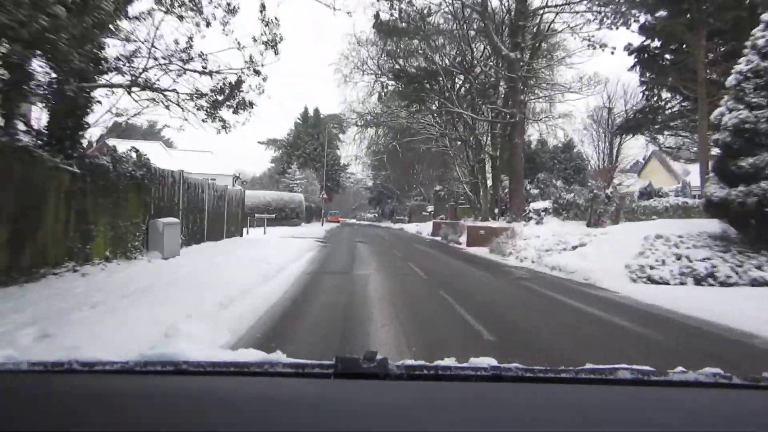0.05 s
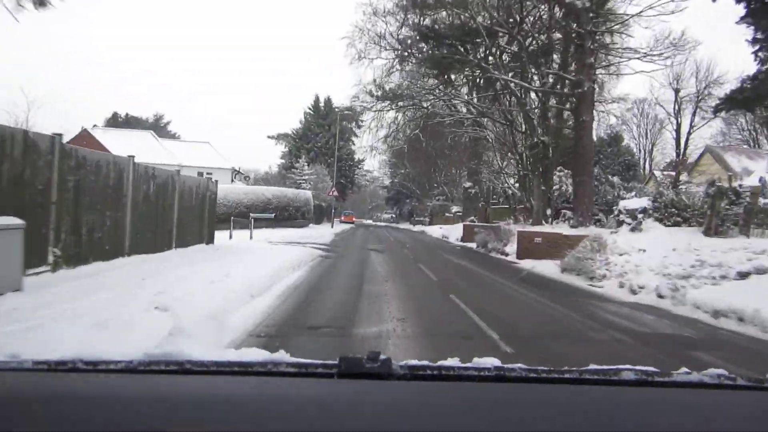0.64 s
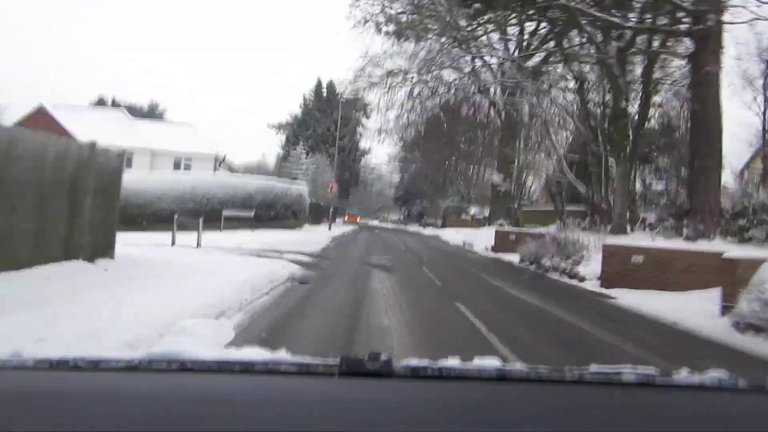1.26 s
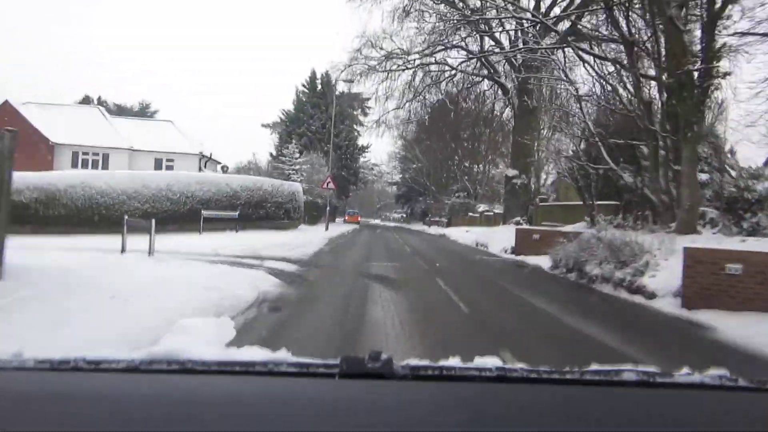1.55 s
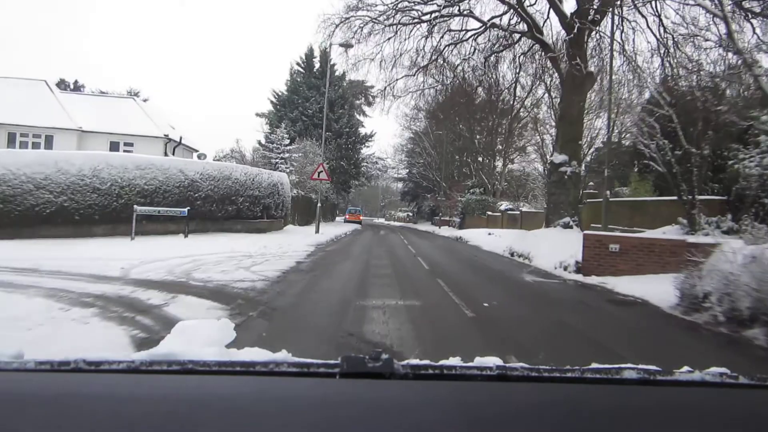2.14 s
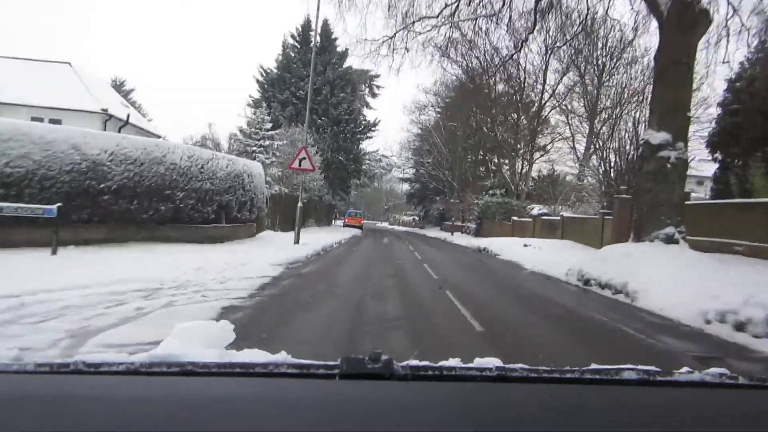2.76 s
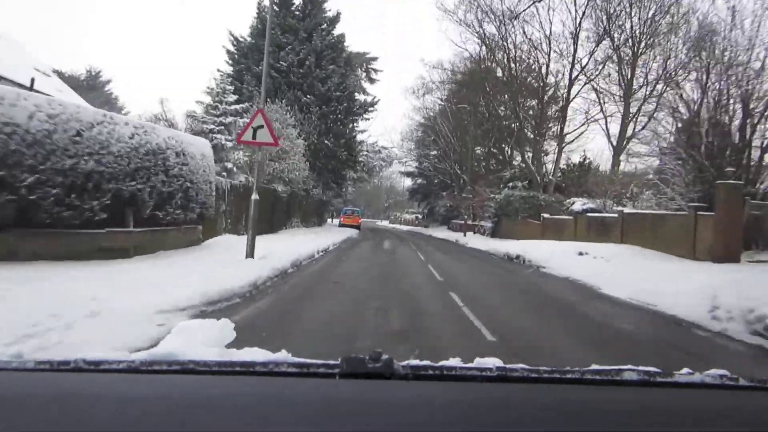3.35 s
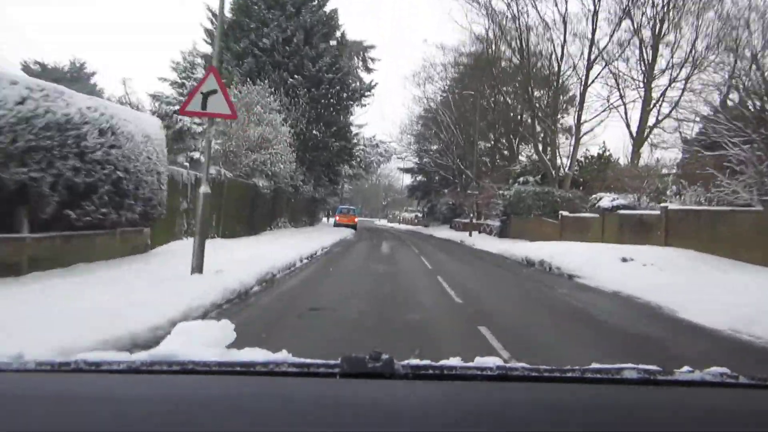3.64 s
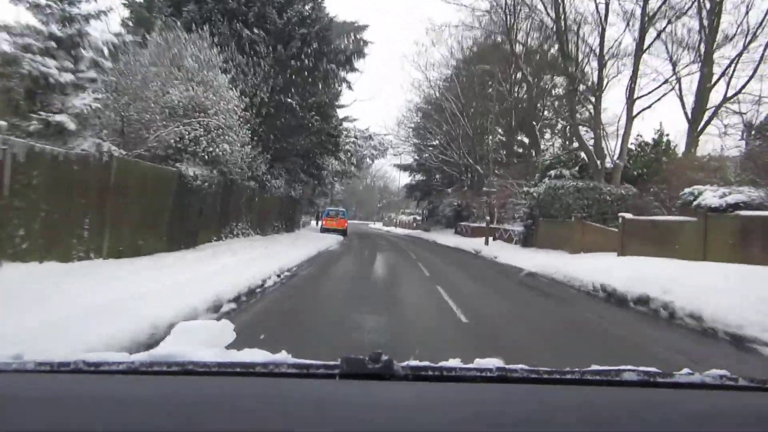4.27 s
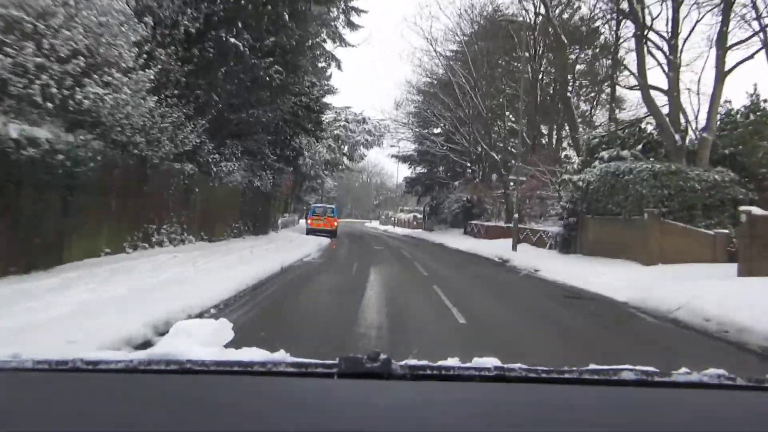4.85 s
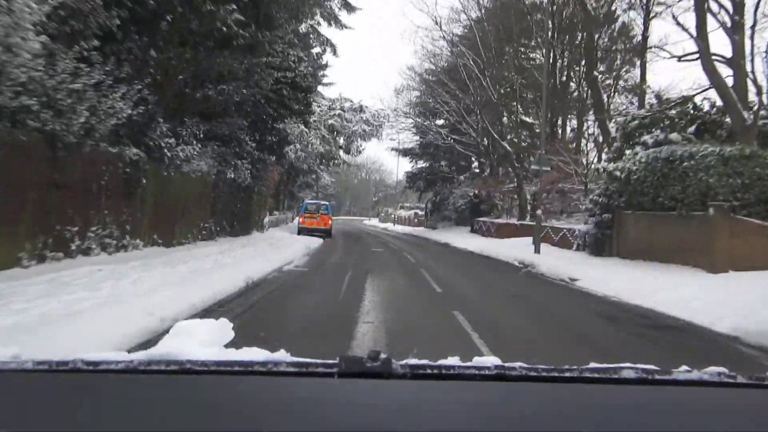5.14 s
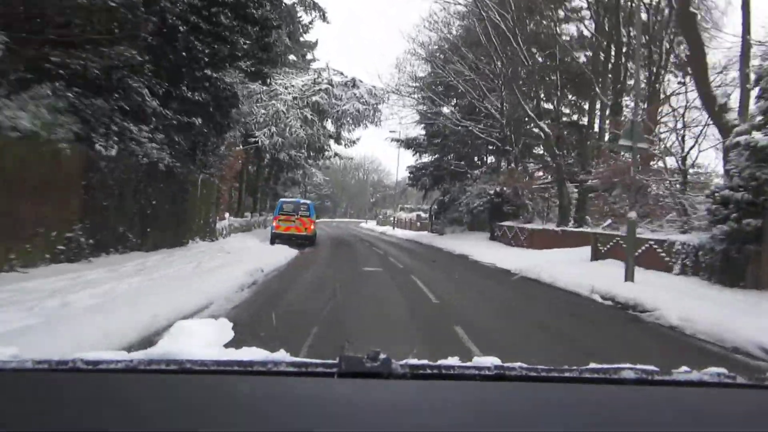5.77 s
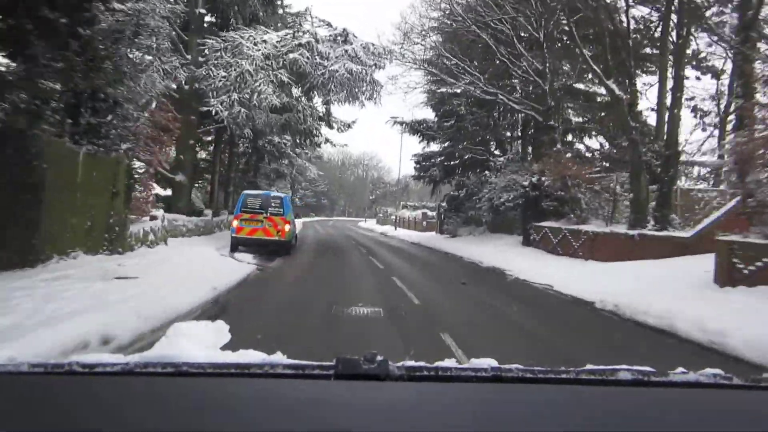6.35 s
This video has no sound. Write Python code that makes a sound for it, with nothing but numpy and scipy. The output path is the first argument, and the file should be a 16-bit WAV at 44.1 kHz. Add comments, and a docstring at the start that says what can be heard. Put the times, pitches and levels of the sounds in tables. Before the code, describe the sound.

Heard from behind the windscreen of a moving car, a low engine drone and tyre rumble run throughout, with a faint hiss of water and slush. A little after one second the wheels knock over a road seam and the plastic trim rattles. More bumps follow at around two seconds and just after four, each with a low shudder. Near the end the wet hiss swells.

```python
"""A low drone and rumble fill a small car on a wet winter road: the engine fires, the tyres excite the cabin.
Water and slush fizz in the wheel arches; the hiss swells on a wetter stretch near the end.
Each road seam strikes the front wheels and, a quarter of a second later, the rear: knocks, a shudder,
clunking joints, rattling trim. A faint whistle comes and goes, and grit pings off the underbody.
The camera's gain control ducks after hard jolts and creeps back."""
import sys
import numpy as np
from scipy import signal
from scipy.fft import rfft, irfft, next_fast_len
from scipy.io import wavfile
from scipy.ndimage import uniform_filter1d, map_coordinates

SR = 44100
rng = np.random.default_rng(int(sys.argv[2]) if len(sys.argv) > 2 else 0)


def master_out(mix):
    """Clip the mix to full scale and print it as 16-bit PCM to the path in sys.argv[1]."""
    frames = np.transpose(np.atleast_2d(mix))
    ceiling = np.clip(frames, -1, 1)
    pcm = np.round(ceiling * 32767).astype(np.int16)
    wavfile.write(sys.argv[1], SR, pcm)


N = 287091


def amp(db):
    """Decibels to amplitude ratio."""
    return 10 ** (np.asarray(db) / 20)

def unit(x):
    """Normalisation to rms 1."""
    return x / np.sqrt(np.mean(x ** 2) + 1e-20)

def clock():
    """The time of every sample."""
    return np.arange(N) / SR

def curves(rows):
    """Linear interpolation of each column after the time, one value per sample."""
    s, *cols = np.transpose(rows)
    return [np.interp(clock(), s, c) for c in cols]

def bursts(rows):
    """A sum of Gaussian envelopes from rows of t/s, level/dB, half length/s."""
    return sum(amp(db) * np.exp(-((clock() - s) / half) ** 2) for s, db, half in rows)

def wobble(rate):
    """Smooth random modulation, rate knots a second."""
    return map_coordinates(rng.standard_normal(int(N * rate / SR) + 4), [clock() * rate])

def noise():
    """White Gaussian noise."""
    return rng.standard_normal(N)

def grains(rate, spread_db):
    """Shot noise: impulses of uneven size, rate a second, at rms 1."""
    impulses = (rng.random(N) < rate / SR) * noise()
    return unit(impulses * amp(spread_db * rng.exponential(size=N).clip(0, 4)))

def filtered(x, response):
    """Linear filtering: the spectrum of x times a frequency response."""
    m = next_fast_len(len(x) + SR // 2)
    return irfft(rfft(x, m) * response(np.fft.rfftfreq(m, 1 / SR)), m)[:len(x)]

def coloured(x, spectrum):
    """Spectral shaping by points of f/Hz, level/dB, at rms 1."""
    hz, db = np.transpose(spectrum)
    return unit(filtered(x, lambda f: amp(np.interp(np.log(f + 1), np.log(hz), db, -120))))

def resonate(x, modes):
    """Forced response of parallel resonators with rows of f/Hz, bandwidth/Hz, gain/dB."""
    return filtered(x, lambda f: sum(amp(db) * 1j * f * width / (hz * hz - f * f + 1j * f * width)
                                     for hz, width, db in modes))

def narrowband(x, hz, width):
    """One resonance applied twice, at rms 1."""
    mode = [(hz, width, 0)]
    return unit(resonate(resonate(x, mode), mode))

def band(x, low_hz, high_hz, order=4):
    """A band-pass with Butterworth slopes."""
    return filtered(x, lambda f: 1 / np.sqrt((1 + (low_hz / (f + 1)) ** (2 * order))
                                             * (1 + (f / high_hz) ** (2 * order))))

def add(track, s, sound):
    """Superpose a sound on the track at time s."""
    part = track[round(s * SR):][:len(sound)]
    part += sound[:len(part)]

def chirps(rows):
    """Narrow-band noise pulses from rows of t/s, level/dB, f/Hz, bandwidth/Hz, half length/s."""
    out, t = np.zeros(N), np.arange(-SR // 20, SR // 20) / SR
    for s, db, hz, width, half in rows:
        ring = narrowband(rng.standard_normal(len(t)), hz, width)
        add(out, s + t[0], amp(db) * np.exp(-(t / half) ** 2) * ring)
    return out

def free_decay(t, hz, db, t60, rise_s):
    """Free vibration: a sum of damped sinusoids with a soft onset."""
    ring = np.sum(amp(db - 60 * t / t60) * np.sin(2 * np.pi * hz * t), axis=0)
    return ring * (1 - np.exp(-t / rise_s))


# engine firing: t/s, f/Hz, fundamental level/dB, second harmonic level/dB
FIRING = [(0, 49.26, -22, -38), (.7, 48.9, -25.5, -35), (3.3, 48.8, -26.5, -38), (4.4, 48.43, -23, -35),
          (5.1, 47, -33.5, -31.5), (5.9, 46.3, -24, -31.5), (6.51, 47, -29, -34)]

def engine():
    """Transmission loss: the bulkhead passes only the firing frequency and its second harmonic."""
    hz, db, harmonic_db = curves(FIRING)
    phase = 2 * np.pi * np.cumsum(hz * (1 + 0.0064 * wobble(4.5))) / SR
    drone = amp(db) * unit(np.sin(phase)) + amp(harmonic_db) * unit(np.sin(2 * phase))
    return amp(1.7 * wobble(12)) * drone


# coarseness of the asphalt: t/s, relative level/dB
COARSENESS = [(0, -1.5), (.4, -1.5), (.8, 1), (1.15, 1.5), (1.7, -1.5), (2.2, 1.5), (2.45, 0.4), (2.8, -2),
              (3.7, 0), (4.9, -1), (6.3, 1)]
# cabin air, panel and tyre cavity resonances: f/Hz, bandwidth/Hz, gain/dB
CABIN_MODES = [(27, 8.1, 6), (47.7, 6.8, -1.5), (62, 26, -5.5), (86, 17, -.8), (103, 15, -4.5),
               (154, 22, -9.5), (206, 8, -12), (221, 9, -6.5), (286, 8, -23), (366.6, 48, -17),
               (405, 32, -27), (468, 114, -17.5)]
# glass and door resonances: f/Hz, bandwidth/Hz, gain/dB
PANEL_MODES = [(840, 27, -5), (995, 40, -3), (1170, 60, -1), (1315, 40, -3.5), (1478, 32, -5),
               (1900, 48, -1)]
# tread roar: f/Hz, relative spectrum level/dB
TREAD_SPECTRUM = [(150, -39), (330, -12.5), (480, -7), (580, 1), (830, 0), (1010, -3.5), (1110, -10.5),
                  (1550, -11.5), (2100, -20.5), (3500, -34), (8000, -53)]
RUMBLE_DB, ROAR_DB = -22, -40.5  # on average asphalt

def tyres():
    """Random forcing: rough asphalt drives the cabin resonances, and the tread roars above them."""
    coarse_db, = curves(COARSENESS)
    throb_db = 1.1 * wobble(26)  # coarse and smooth patches pass under the wheels
    rumble = unit(band(resonate(noise(), CABIN_MODES), low_hz=24.4, high_hz=389.0))
    tread = noise()
    roar = coloured(tread + resonate(tread, PANEL_MODES), TREAD_SPECTRUM)
    return amp(RUMBLE_DB + coarse_db + throb_db) * rumble + amp(ROAR_DB + 1.07 * coarse_db) * roar


# water on the road: t/s, relative level/dB
ROAD_WATER = [(0, 0), (1, 1), (1.6, -.5), (2.2, 1.5), (2.9, -1.5), (3.3, -0.5), (3.65, 0.5), (4.15, 0),
              (4.5, 0), (5.1, -.5), (5.85, 1), (6.2, 8), (6.51, 9)]
# wet tread: f/Hz, relative spectrum level/dB
HISS_SPECTRUM = [(700, -37), (1600, 4.5), (2300, 1.5), (2850, 3), (3900, -2.5), (4900, -8), (6200, -14.5),
                 (7200, -25), (8000, -21), (9000, -18), (15000, -41)]
# water in the wheel arches: f/Hz, relative spectrum level/dB
FIZZ_SPECTRUM = [(2500, -17), (5000, 5), (7000, 8), (9000, 2), (11400, 2), (12100, 0), (12600, 0),
                 (13500, -0.5), (15700, -12)]
HISS_DB, FIZZ_DB = -56, -66.5  # at a wetness of 0 dB

def water():
    """Broadband and shot noise: wet tread hisses and drops patter in the arches, more on a wetter road."""
    wet_db, = curves(ROAD_WATER)
    splash_db = 0.23 * wobble(28)
    drops = amp(-11.5) * grains(rate=160, spread_db=-3.5)
    hiss = amp(HISS_DB + wet_db) * coloured(noise(), HISS_SPECTRUM)
    fizz = amp(FIZZ_DB + 0.46 * wet_db) * coloured(noise() + drops, FIZZ_SPECTRUM)
    return amp(splash_db) * (hiss + fizz)


# patches of slush: t/s, level/dB, half length/s
SLUSH_PATCHES = [(.13, -64, 0.016), (.6, -63, .03), (.94, -60.5, 0.094), (1.065, -63, 0.04),
                 (1.89, -64, .04), (2.44, -62, 0.03), (3.6, -65, 0.072), (3.77, -66, .06), (3.88, -69, .02),
                 (4.262, -64, .009), (4.29, -68, .01), (4.375, -66, 0.008), (4.66, -66, 0.061)]
# slush on the underbody: f/Hz, relative spectrum level/dB
SLUSH_SPECTRUM = [(2500, -20), (5000, 3), (7000, -1), (8600, -.5), (11000, 2), (13000, -.5), (14500, -9),
                  (15700, -10)]

def slush():
    """Impact noise: slush spatters the underbody in short gushes, at each patch and each road seam."""
    *_, slush_db, _, _, _ = np.transpose(ROAD_SEAMS)
    gushes = bursts(SLUSH_PATCHES) + both_axles(slush_db, rear_db=-1)
    spatter = amp(4) * grains(rate=2200, spread_db=2.5)
    return gushes * coloured(noise() + spatter, SLUSH_SPECTRUM)


# rubbing trim: t/s, level/dB, f/Hz, bandwidth/Hz, half length/s
TRIM_RUBS = [(0.972, -49, 8600, 800, .0045), (1.133, -47, 3400, 1000, .007),
             (1.293, -57, 10000, 900, 0.006), (1.312, -43.5, 7200, 3800, 0.006)]

def squeaks():
    """Friction: plastic panels squeak briefly where they rub."""
    return chirps(TRIM_RUBS)


# seams under the front wheels: t/s, half length/s, scrub/dB, rattle/dB, rear re front/dB, slush/dB,
# front shudder/dB, rear shudder/dB, rear shudder fade/s
ROAD_SEAMS = [(1.212, 0.046, -28, -42, -3, -65, -20, -7, 0.14),
              (2.277, 0.019, -36, -46, -17, -69, -13.5, -12, .12),
              (3.633, 0.076, -38.5, -57, -23, -73, -25, -11, 0.031),
              (4.279, 0.021, -33, -51, -28, -76, -41, -37, 0.047),
              (4.357, 0.031, -31, -57, -14, -63.5, -15, -9.5, 0.077)]
AXLE_LAG_S = .255

def scrub():
    """Transient excitation: the tread scrubs over each seam in a burst of low, gritty noise."""
    _, _, scrub_db, _, rear_db, *_ = np.transpose(ROAD_SEAMS)
    return both_axles(scrub_db, rear_db) * scrub_noise()

def both_axles(level_db, rear_db, rear_stretch=1.46):
    """Time delay: an envelope swells as the front wheels, then the rear, cross each seam."""
    s, half = np.transpose(ROAD_SEAMS)[:2]
    front = bursts(zip(s, level_db, half))
    rear = bursts(zip(s + AXLE_LAG_S, level_db + rear_db, half * rear_stretch))
    return front + rear


# scrubbing tread: f/Hz, relative spectrum level/dB
SCRUB_SPECTRUM = [(200, 13.5), (330, 6), (520, 8), (700, -9), (1000, 0), (1300, -10), (2100, -17.5),
                  (3600, -30.5), (5500, -34), (12000, -60), (15700, -58)]

def scrub_noise():
    """Contact noise of the tread, strongest at low frequencies."""
    return coloured(noise(), SCRUB_SPECTRUM)


# plastic trim resonances: f/Hz, bandwidth/Hz, gain/dB
TRIM_MODES = [(1190, 500, -4), (1750, 500, -8), (2550, 800, -3.5), (3300, 520, -1.8), (4000, 600, -6),
              (5400, 700, -16.5), (6350, 470, -22), (7200, 200, -11), (8600, 900, -23), (10700, 2200, -22),
              (13000, 1500, -28)]
# hardest contacts of the trim: t/s, level/dB, chatter T60/s, tilt/(dB per octave)
TRIM_CLICKS = [(1.1851, -17.5, .04, -2), (1.2035, -27, .025, -2), (1.2145, -27, .018, 0),
               (1.2365, -19.5, .033, -1.5), (1.2565, -28.5, .035, 1), (1.263, -31, .03, .5),
               (1.276, -37, .25, -4), (1.3245, -33, .01, 2), (1.411, -34, .015, 2), (1.431, -38, .005, 3),
               (1.436, -38, .04, -4), (1.443, -39, .004, 4), (1.4475, -32.5, .045, -3),
               (1.469, -25.5, .003, 4), (1.4946, -33, .045, -2), (1.508, -25.5, .004, 3.5),
               (1.511, -30, .005, 3), (1.528, -35, .06, -3), (2.251, -39.5, .045, 2), (2.268, -39, .02, -1),
               (2.4883, -39.5, .03, -1), (2.7004, -40, .025, -2), (4.2564, -42, .09, 1),
               (4.324, -36, .05, -3)]
MODE_SCATTER = .04  # relative spread of mode frequencies from blow to blow

def trim():
    """Intermittent contact: plastic panels chatter at every jolt and click together at the hardest."""
    ticks = amp(3) * grains(rate=600, spread_db=5)
    _, _, _, rattle_db, rear_db, *_ = np.transpose(ROAD_SEAMS)
    rattle = resonate(both_axles(rattle_db, rear_db) * unit(noise() + ticks), TRIM_MODES)
    for s, db, t60, brightness in TRIM_CLICKS:
        add(rattle, s, amp(db) * click(t60, brightness))
    return band(rattle, low_hz=400, high_hz=9700, order=2)

def click(t60, brightness):
    """Impact excitation: a tick, then a crack and chatter ring modes that vary from spot to spot."""
    t = np.arange(SR // 5) / SR
    contact = amp(-3) * signal.unit_impulse(len(t), 4)
    chatter = amp(-60 * t / t60) * rng.standard_normal(len(t))
    crack = amp(3) * np.diff(amp(-60 * t / 0.0008) * rng.standard_normal(len(t)), prepend=0)
    modes = [(hz * (1 + MODE_SCATTER * rng.standard_normal()), width, db) for hz, width, db in TRIM_MODES]
    tilt = lambda f: amp(brightness * np.log2(np.maximum(f, 1000) / 4000))
    return filtered(contact + resonate(crack + chatter, modes), tilt)


# wheel and suspension modes: f/Hz, level/dB, T60/s
WHEEL_MODES = [(44.1, -5, 0.4), (100.6, 5.5, 0.081), (192, -19, 0.24), (214.8, 6, 0.13), (330, 0.5, 0.026),
               (483, -8, 0.058), (834, -12, .03)]
# blows on the front tyres: t/s, level/dB, hardness/(dB per octave)
TYRE_BLOWS = [(1.185, -22, -2), (1.209, -14.5, -2), (1.2365, -10.5, -2.5), (1.2573, -15.5, -1.5),
              (2.252, -23, -4), (2.273, -15.5, -1.5), (2.312, -30, 2), (3.624, -24, 0),
              (4.295, -17.5, -1.5), (4.334, -14, -4), (4.3585, -14, -1.5)]
REAR_KNOCK_DB = -12  # re front

def knocks():
    """Modal ringing: each blow excites a front wheel, then a rear; a sharper edge favours higher modes."""
    out, t = np.zeros(N), np.arange(SR // 4) / SR
    hz, level, t60 = np.transpose(WHEEL_MODES)[:, :, None]
    for s, db, hardness in TYRE_BLOWS:
        for lag, axle_db in (0, 0), (AXLE_LAG_S, REAR_KNOCK_DB):
            mode_db = level + hardness * np.log2(hz / np.median(hz)) + rng.standard_normal(hz.shape)
            add(out, s + lag, amp(db + axle_db) * free_decay(t, hz, mode_db, t60, rise_s=0.002))
    return out


def shudders(front_lag_s=0.0561, front_fade_s=0.044):
    """Shock response: each seam shakes the body after the front wheels, then harder under the rear."""
    return sum(heave(s + front_lag_s, front_db, front_fade_s) + heave(s + AXLE_LAG_S, rear_db, fade_s)
               for s, *_, front_db, rear_db, fade_s in ROAD_SEAMS)

def heave(s, db, fade_s, rise_s=0.055, hz=26.5):
    """Nonlinear stiffness: the mounts sharpen each downstroke of a shake that peaks at time s."""
    t = clock() - s
    phase = 2 * np.pi * hz * t
    stroke = np.cos(phase) + amp(-9) * np.cos(2 * phase) + amp(-6) * np.cos(3 * phase)
    envelope = np.exp(-(t / np.where(t < 0, rise_s, fade_s)) ** 2)
    return -amp(db) * envelope * stroke


# modes of a suspension joint: f/Hz, level/dB, T60/s
JOINT_MODES = [(393, -18, .035), (496, -1.5, 0.041), (637, -4, .025)]
# impacts in the joints: t/s, level/dB
JOINT_IMPACTS = [(1.258, -24), (1.434, -20), (1.442, -20.5), (1.451, -22), (2.2675, -16.5), (2.314, -23),
                 (4.356, -21)]

def clunks():
    """Backlash: suspension joints take up their play with a short, woody clunk."""
    out, t = np.zeros(N), np.arange(SR // 10) / SR
    hz, level, t60 = np.transpose(JOINT_MODES)[:, :, None]
    for s, db in JOINT_IMPACTS:
        pitch = hz * (1 + MODE_SCATTER * rng.standard_normal(hz.shape))
        add(out, s, amp(db) * free_decay(t, pitch, level, t60, rise_s=0.0016))
    return out


# whistle in the cabin: t/s, level/dB
WHISTLE_LEVEL = [(0, -90), (2.1, -88), (2.45, -76), (2.9, -86), (3.8, -82), (4.7, -82), (5.3, -88),
                 (6.51, -89)]

def whistle():
    """Narrow-band noise is heard as a pitch: a faint, fuzzy tone comes and goes high above the hiss."""
    db, = curves(WHISTLE_LEVEL)
    return amp(db + 2.5 * wobble(8)) * narrowband(noise(), hz=12060, width=170)


# chips of grit: t/s, level/dB, f/Hz, bandwidth/Hz, half length/s
GRIT_STRIKES = [(4.298, -56, 11500, 2800, .0015), (4.333, -50, 9000, 3500, .0014),
                (4.404, -55, 11700, 2500, .0015)]

def grit():
    """Brief impacts radiate high frequencies: chips of grit ping off the underbody."""
    return chirps(GRIT_STRIKES)


def scene():
    """Superposition of all sources at a microphone behind the windscreen."""
    cruising = engine() + tyres() + water() + slush()
    jolts = squeaks() + scrub() + trim() + knocks() + shudders() + clunks()
    return (cruising + jolts + whistle() + grit())[None]

def gain_control(x, threshold_db=-13, average_s=0.018, attack_s=0.032, recovery_s=0.49):
    """Compression: gain drops by the excess level, too late for the blow itself, then recovers slowly."""
    power = np.abs(uniform_filter1d(x ** 2, round(average_s * SR)))
    excess_db = np.maximum(10 * np.log10(power + 1e-12) - threshold_db, 0)
    fade = np.exp(-clock() / recovery_s)
    duck_db = fade * np.maximum.accumulate(excess_db / fade)  # decaying peak hold
    step = 1 / (attack_s * SR)
    return x * amp(-signal.lfilter([step], [1, step - 1], duck_db))

def record(dry):
    """Band limiting: the camera rides its gain and passes nothing above its cutoff."""
    return filtered(gain_control(dry[0]), lambda hz: hz < 15760)[None]


dry = scene()
out = record(dry)
master_out(out)
```